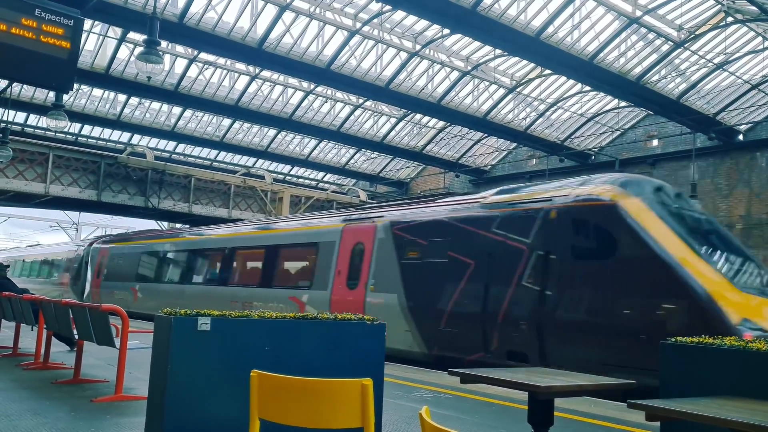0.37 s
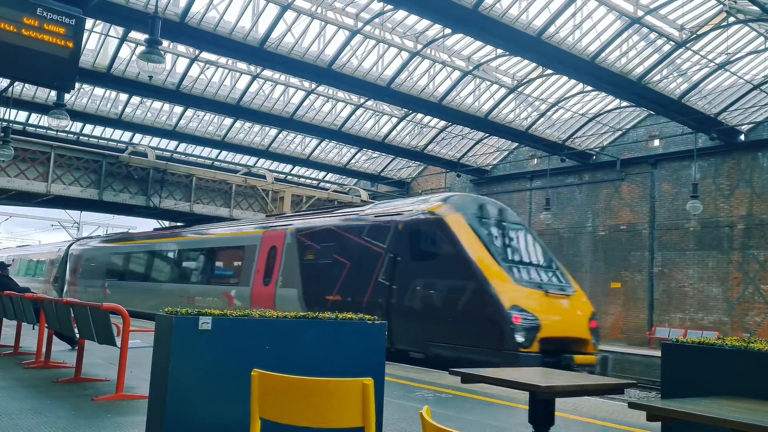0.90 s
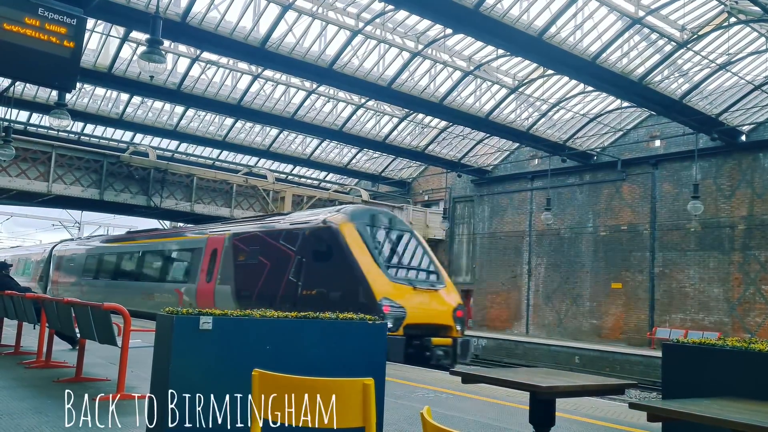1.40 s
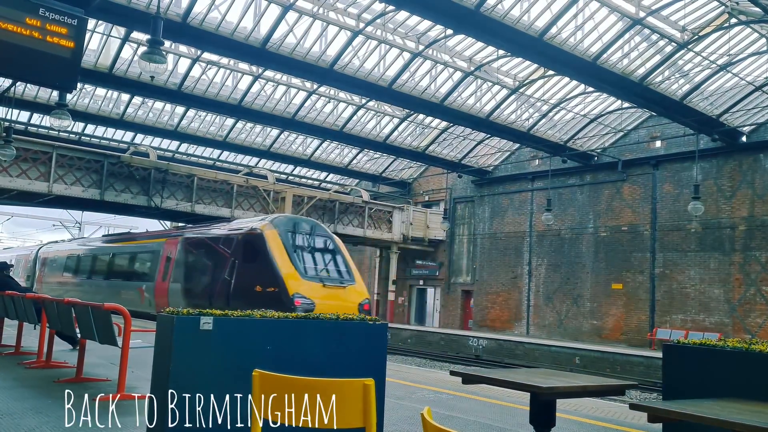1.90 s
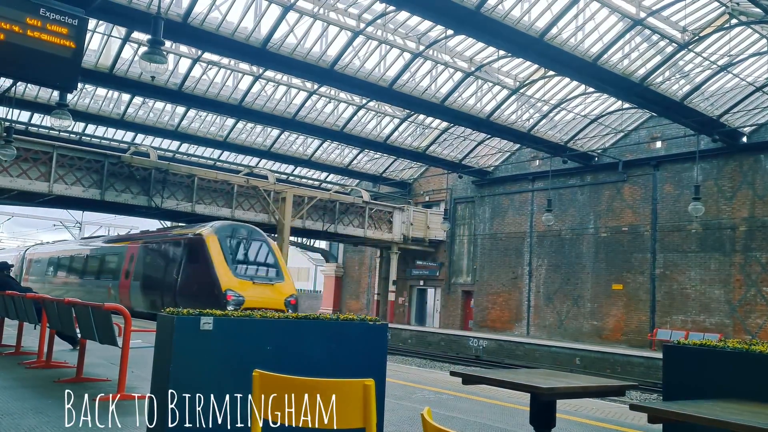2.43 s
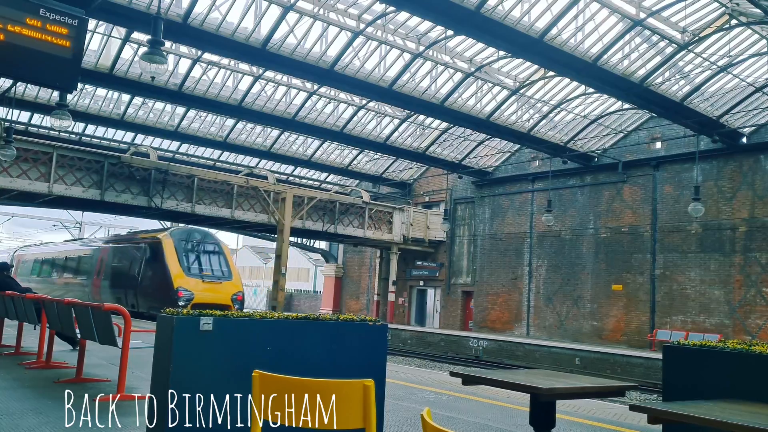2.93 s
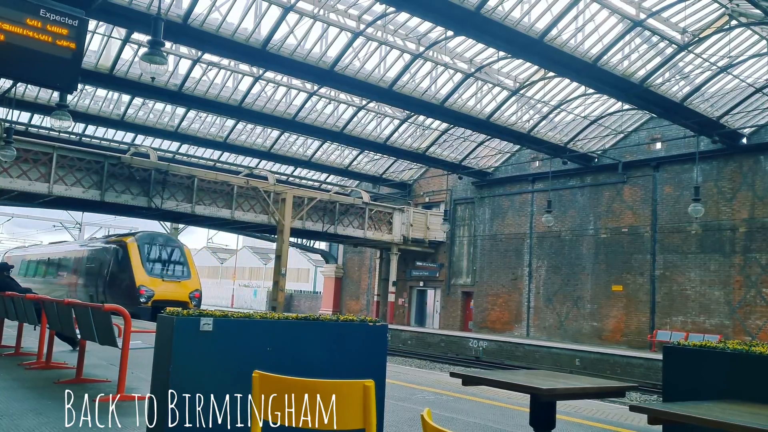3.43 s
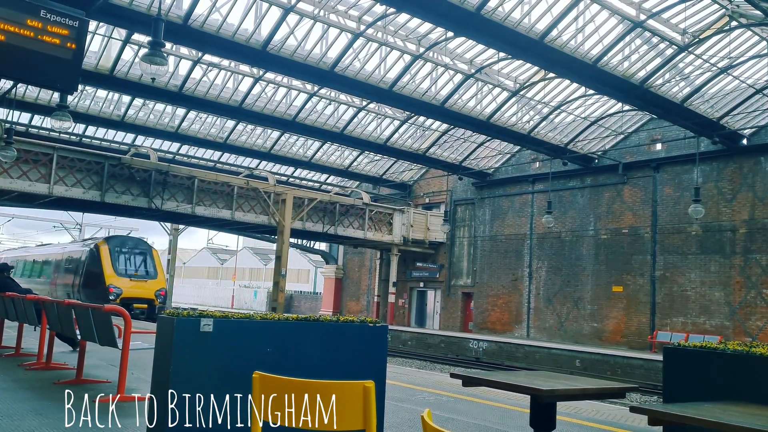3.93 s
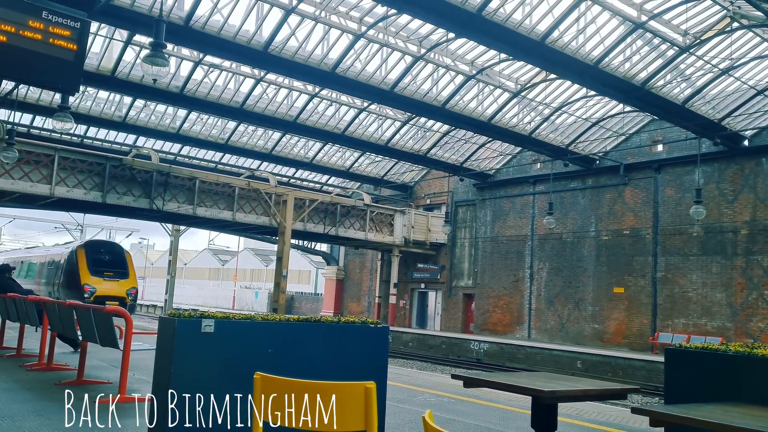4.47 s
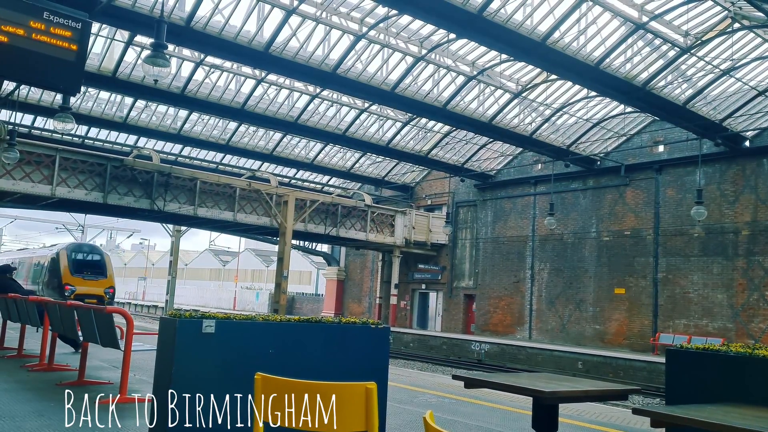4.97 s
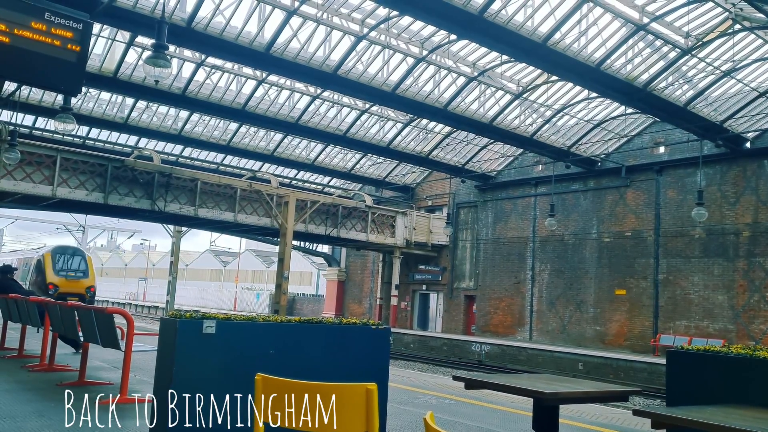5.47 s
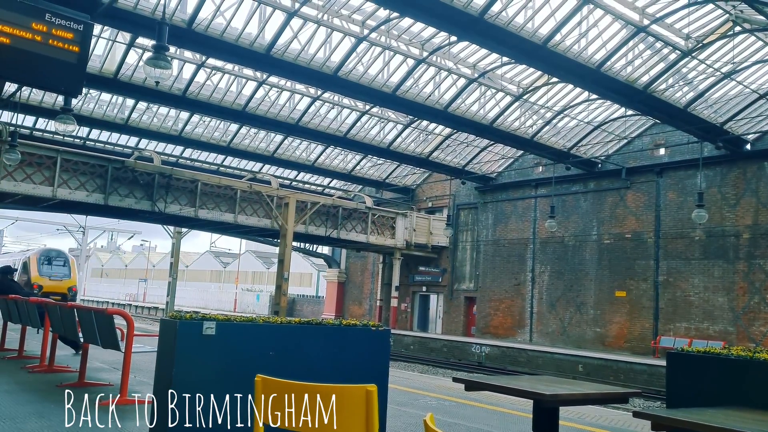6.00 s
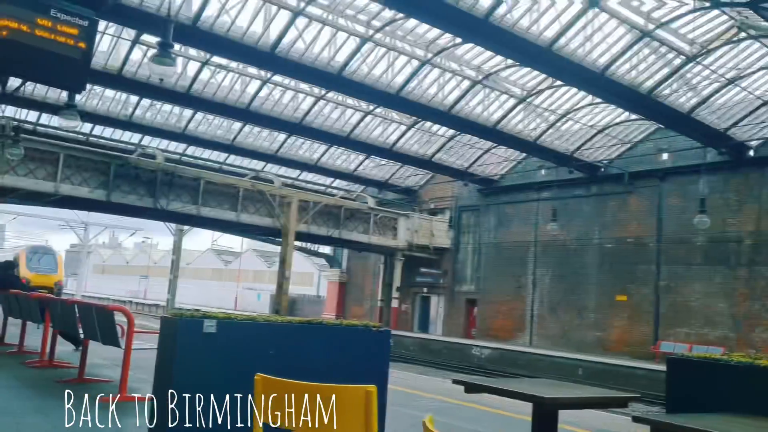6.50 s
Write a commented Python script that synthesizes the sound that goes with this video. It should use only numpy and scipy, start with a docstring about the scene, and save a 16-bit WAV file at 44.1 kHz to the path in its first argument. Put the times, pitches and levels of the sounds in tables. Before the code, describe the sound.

Deep pulsing train engines and a breathy turbo whistle recede from a covered platform, growing duller while thin whines waver in the echoing space.

```python
"""A diesel train pulls away under a large station roof, its engines droning: sines on orders of their
firing cycle. A broad roar with hollow notes and turbocharger whistles near 4.3 kHz is shaped noise,
over a steady hall background; two faint whines waver in pitch. The train sinks and dulls with
distance, while a thin tone near 10 kHz, a single sine, stays behind and slowly grows."""
import sys
import numpy as np
from scipy import signal
from scipy.io import wavfile
from scipy.ndimage import uniform_filter1d

SR = 44100
rng = np.random.default_rng(int(sys.argv[2]) if len(sys.argv) > 2 else 0)


def generate_wav(signal):
    """Clip the signal to [-1, 1] and save it as 16-bit WAV at the path in sys.argv[1]."""
    frames = np.transpose(np.atleast_2d(signal))
    scaled = np.clip(frames, -1, 1) * 32767
    pcm = np.round(scaled).astype(np.int16)
    wavfile.write(sys.argv[1], SR, pcm)


def rack_gain(trim_db):
    """Turn a fader trim in dB into the linear factor to multiply a signal by."""
    fader = np.asarray(trim_db, float)
    return 10 ** (fader / 20)


N = 291942

# Distance of the train. Each row: time in seconds, distance from 0 (near) to 1 (far).
AWAY = [(0, .01), (.6, 0.026), (1.5, 0.113), (2.1, 0.154), (3.4, 0.395), (4.1, 0.505), (5.5, 0.724),
        (6, 0.74), (6.62, 0.85)]
# Side of the sound by pitch. Each row: frequency in Hz, left over right in dB.
LEAN = [(30, 0), (70, 0), (240, -2), (400, 0.4), (970, -2.5), (1550, -6.5), (2460, -4.5), (4300, -1),
        (6230, 2.5), (9910, 6)]
LEFT_LEAD_S = 0.0003996  # the left port hears the train first


def evened(x):
    """Scales to rms 1."""
    return x / np.sqrt(np.mean(x ** 2) + 1e-20)


def read(points, hz):
    """Spectrum table interpolated on a log-frequency axis."""
    f, value = np.transpose(points)
    return np.interp(np.log(hz + 1), np.log(f + 1), value)


def distance(t):
    """Distance of the train at times t, 0 near to 1 far."""
    s, away = np.transpose(AWAY)
    return np.interp(t, s, away)


def between(near, far, away):
    """Straight line from a near value to a far value."""
    return near + away * (far - near)


def drift(top_hz):
    """Slow random curve of rms 1: twelve sines from top_hz / 8 to top_hz, random phases."""
    t = np.arange(0, N, 256) / SR
    slow = sum(np.sin(2 * np.pi * (f * t + rng.random())) for f in top_hz * np.geomspace(1 / 8, 1, num=12))
    return np.interp(np.arange(N) / SR, t, evened(slow))


def bump(t, middle, length):
    """Smooth rise and fall from 0 to 1 and back."""
    return np.cos(np.pi * np.clip((t - middle) / length, -.5, .5)) ** 2


def swollen(t, usual_db, swells):
    """Level in dB with swells added on top, power to power."""
    power = rack_gain(usual_db) ** 2
    power = power + sum((rack_gain(db) * bump(t, s, length)) ** 2 for s, length, db in swells)
    return 10 * np.log10(power + 0 * t)


def peak(hz, centre_hz, width_hz):
    """Power response of a resonance applied twice."""
    return 1 / (1 + (2 * (hz - centre_hz) / width_hz) ** 2) ** 2


def pair(phase, lead, level_db, pan_db):
    """Tone of rms level_db at both microphone ports, the left ahead by twice lead radians."""
    gains = rack_gain(level_db + np.array([pan_db / 2, -pan_db / 2]))
    return gains * np.sqrt(2) * np.array([np.sin(phase + lead), np.sin(phase - lead)])


def hall_power(hz):
    """Steady background of the station hall, power per Hz."""
    # Each row: frequency in Hz, level in dB per Hz.
    hall = [(20, -67), (150, -67), (500, -80.5), (1500, -87), (3300, -95), (5500, -102), (8000, -121),
            (10000, -124)]
    return rack_gain(read(hall, hz)) ** 2


def broad_power(hz, t):
    """Exhaust, fans and wheels, power per Hz; the air takes the treble first."""
    # Roar before the bass trim, near and far. Each row: frequency in Hz, level in dB per Hz.
    near = [(20, -55.5), (50, -50), (110, -49), (200, -51), (330, -61), (600, -66), (1000, -68.5),
            (1250, -68), (1600, -72), (2600, -76), (3300, -84.5), (5300, -86.5), (7100, -89.5), (7800, -95),
            (10000, -98)]
    far = [(20, -63), (50, -64.5), (110, -61), (200, -61.5), (330, -73.5), (600, -76.5), (1000, -79),
           (1250, -77), (1600, -83), (2600, -87), (3300, -100), (5300, -105), (6900, -109), (7600, -115),
           (10000, -118)]
    bass_hz, early_dull_hz = 300, 12000
    rumble_db = -1.5 + 3.4 * bump(t, 2.76, 3)  # bass trim with one swell
    # at early_dull_hz the fade runs as the root of distance
    gone = np.clip(distance(t), 0, 1) ** (1 / (1 + hz / early_dull_hz))
    level_db = (1 - gone) * read(near, hz) + gone * read(far, hz)
    return rack_gain(level_db + rumble_db / (1 + (hz / bass_hz) ** 2)) ** 2


def hollow_power(hz, away):
    """Hollow notes within the roar: resonant peaks that fade with distance, power per Hz."""
    # Each row: centre in Hz, width in Hz, near level in dB per Hz, far level in dB per Hz.
    hollows = [(518, 27, -63.5, -81.5), (640, 24, -73, -84.5), (760, 38, -72.5, -76), (840, 120, -66, -73),
               (1107, 44, -66.5, -82.5), (1337, 120, -68.5, -75)]
    return sum(rack_gain(between(near_db, far_db, away)) ** 2 * peak(hz, f, width)
               for f, width, near_db, far_db in hollows)


def whistle_power(hz, away):
    """Unsteady turbocharger whistles as narrow noise peaks with second harmonics, power per Hz."""
    # Each row: centre in Hz, width in Hz, level before the fade in dB per Hz.
    whistles = [(4120, 600, -79), (4270, 210, -64.5), (4347, 260, -64.5), (4420, 207, -66.5)]
    fade_db = between(1.5, -14.5, away)
    overtone = rack_gain(between(-28.5, -41, away)) ** 2  # second harmonic against the first
    return sum(rack_gain(db + fade_db) ** 2 * (peak(hz, f, width) + overtone * peak(hz / 2, f, width))
               for f, width, db in whistles)


def roar(patchy_db=.5, swell_db=-0.25):
    """Random short-time spectra shaped to the summed power of roar, hollows, whistles and hall."""
    # Likeness of the ports. Each row: frequency in Hz, left-right correlation.
    likeness = [(60, 0.84), (120, 0.89), (260, 0.78), (540, 0.093), (1110, -0.022), (2300, -0.043),
                (4780, -0.00021), (9910, 0.078)]
    size, hop = 2048, 512
    frames, hz = N // hop + 5, np.fft.rfftfreq(size, 1 / SR)[:, None]
    t = np.arange(frames) * hop / SR
    away = distance(t)
    power = broad_power(hz, t) + hall_power(hz) + hollow_power(hz, away) + whistle_power(hz, away)

    a, b, c, d, patches = rng.standard_normal((frames, len(hz), 5)).T
    patches = uniform_filter1d(patches, size=20, axis=0)
    patches = evened(uniform_filter1d(patches, size=8, axis=1))
    swell = np.interp(t, np.arange(N) / SR, drift(3.))
    gain = np.sqrt(power) * rack_gain(patchy_db * patches + swell_db * swell)

    same, left = np.clip(read(likeness, hz), -1, 1), a + 1j * b
    right = same * left + np.sqrt(1 - same ** 2) * (c + 1j * d)
    right = right * np.exp(-2j * np.pi * hz * LEFT_LEAD_S)
    lean = rack_gain(read(LEAN, hz) / 2)
    spectra = np.array([left * lean, right / lean]) * gain
    return np.sqrt(SR / size) * signal.istft(spectra, nperseg=size, noverlap=size - hop)[1][:, :N]


def thin_tone(waver_db=2.0, start_s=0.33, rise_s=.2):
    """Faint sine at the top of the range; sets in, slowly grows, wavers in level, phase and side."""
    thin_hz, start_db, growth_db_per_s, left_db, roam_db = 9985.3, -82, 1, 2, 6
    t = np.arange(N) / SR
    level_db = start_db + growth_db_per_s * t + waver_db * drift(11.0)
    phase = 2 * np.pi * thin_hz * t + .3 * drift(12.)
    tone = pair(phase, 0, level_db, left_db + roam_db * drift(0.54))
    return tone * np.clip((t - start_s) / rise_s, 0, 1)


def whines(waver_db=0.5, wander_hz=9):
    """Two wandering sines, scattered by the hall so that each port hears them differently."""
    # Moments when a whine stands out.
    # Each row: middle in seconds, length in seconds, approximate whine pitch in Hz, peak level in dB.
    whine_swells = [(1.894, 1.1, 840, -53), (3.106, 0.89, 1322, -56), (3.55, .6, 840, -50.5),
                    (4.3, 1, 840, -53.5), (5.25, 0.81, 1322, -54.5), (5.75, .7, 1322, -55),
                    (5.85, .6, 840, -65), (6.37, 0.15, 1322, -52)]
    # Usual level of each whine in dB.
    usual_levels_db = (-67, -65)
    t, out = np.arange(N) / SR, np.zeros((2, N))
    for f, usual_db in zip((840, 1325), usual_levels_db):
        own_swells = [(s, length, top_db) for s, length, hz, top_db in whine_swells if abs(hz / f - 1) < 1 / 5]
        level_db = swollen(t, usual_db, own_swells) + waver_db * drift(15.)
        phase = 2 * np.pi * np.cumsum(f + wander_hz * drift(14.)) / SR
        out += pair(phase, drift(6.6), level_db, np.full(N, read(LEAN, f)))
    return out


def engines(spread=0.13, lean_db=-0.5, weak_fade_db=-9.0, waver_db=6.0):
    """Sines on multiples of the firing cycle; their phase and side wander with the echoes."""
    # Strong orders between swells. Each row: multiple of the cycle, near level in dB, far level in dB.
    strong_orders = [(3, -39.5, -51.5), (4, -41.5, -49), (5, -37, -46.5), (6, -37, -50), (8, -34, -47),
                     (9, -36.5, -51)]
    # Weak orders. Each row: multiple of the cycle, near level in dB.
    weak_orders = [(2, -47.5), (2.5, -50), (6.25, -42.5), (7, -44), (7.5, -49), (8.3, -45), (9.3, -49),
                   (10, -48), (10.5, -46.5)]
    # Loudest swells of the drone. Each row: middle in seconds, length in seconds, order, peak level in dB.
    swells = [(0.08, 0.15, 6, -30.5), (0.247, 0.23, 8, -23.5), (0.51, 0.36, 6, -22.5), (0.61, 0.19, 5, -28),
              (0.627, 0.088, 8, -26), (0.707, 0.14, 9, -24.5), (.75, 0.26, 6, -28), (0.828, 0.11, 8, -27),
              (1.1, 0.44, 3, -31), (1.11, 0.64, 8, -26), (1.26, 0.32, 6, -30), (1.447, .4, 8, -29),
              (1.682, 0.37, 6, -29), (1.816, 0.62, 9, -30.5), (1.95, 0.72, 8, -31), (2.014, 0.3, 6, -22.5),
              (2.264, 0.15, 6, -27), (2.43, 0.21, 9, -28.5), (2.506, 0.15, 6, -28.5), (2.7, 0.44, 4, -38),
              (2.71, 0.33, 8, -25.5), (3.007, 1.2, 3, -34.5), (3.102, 0.7, 5, -35), (3.104, 0.56, 6, -35.5),
              (3.494, 0.9, 6, -32.5), (3.74, 0.67, 8, -37), (5.018, 0.33, 6, -34.5), (5.2, 0.57, 8, -36),
              (5.55, 0.79, 6, -37.5), (5.624, 0.53, 8, -33), (6.47, 1.8, 8, -35.5), (6.548, 0.19, 6, -34.5)]
    beat_db, beat_hz = 3.5, 6  # engines and roof echoes beat, so strong orders come and go
    flutter_db, flutter_hz = 1.6, 16  # uneven firing roughens every order
    jitter_rad, jitter_hz = .25, 9  # and blurs its pitch
    t = np.arange(N) / SR
    away = distance(t)
    cycle_hz = between(15.15, 14.85, away)  # sinks as the train speeds away
    order_6_shake_rad = between(.95, .5, away)  # echoes shake the phase

    levels = []
    for k, near_db, far_db in strong_orders:
        usual_db = between(near_db, far_db, away) + beat_db * drift(beat_hz)
        own_swells = [(s, length, db) for s, length, order, db in swells if round(order) == round(k)]
        levels.append((round(k), swollen(t, usual_db, own_swells)))
    for k, db in weak_orders:
        levels.append((k, db + weak_fade_db * away + waver_db * drift(2.5)))

    turns, out = np.cumsum(cycle_hz) / SR, np.zeros((2, N))
    for k, level_db in levels:
        phase = 2 * np.pi * (k * turns + rng.random())
        phase = phase + order_6_shake_rad * np.sqrt(k / 6) * drift(2.) + jitter_rad * drift(jitter_hz)
        lead = np.pi * k * cycle_hz * LEFT_LEAD_S + spread * drift(1.272)
        out += pair(phase, lead, level_db + flutter_db * drift(flutter_hz), np.full(N, lean_db))
    return out


def scene():
    """Roar over the hall, thin tone, whines and engines."""
    return roar() + thin_tone() + whines() + engines()


def top_cut(x):
    """Nothing passes above the cut-off."""
    return signal.sosfilt(signal.butter(12, 10510, fs=SR, output="sos"), x)


def record(dry):
    """Steep linear-phase low-pass at 10030 Hz ends the band just above the thin tone."""
    low_pass = signal.firwin(4095, 10030, window=("kaiser", 9), fs=SR)
    limited = signal.oaconvolve(dry, low_pass[None], "same")
    return top_cut(limited)


dry = scene()
out = record(dry)
generate_wav(out)
```